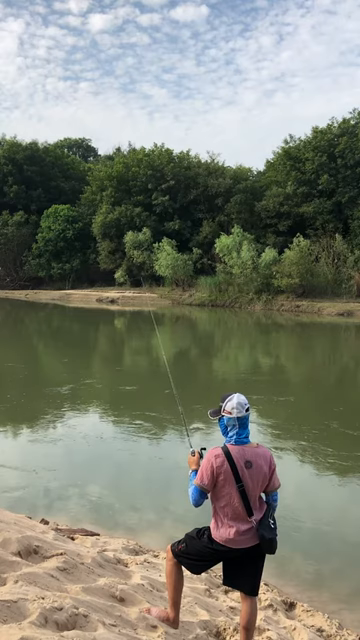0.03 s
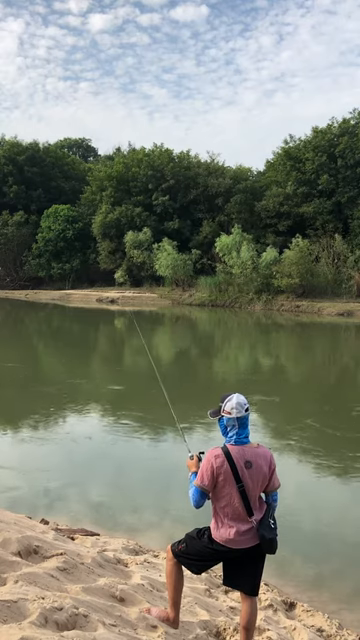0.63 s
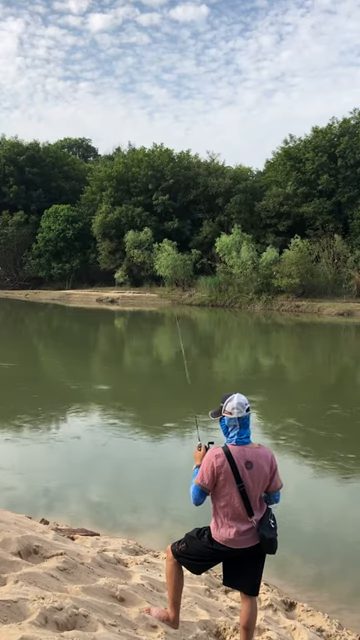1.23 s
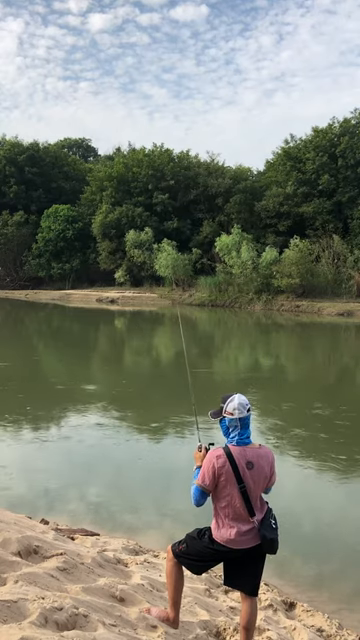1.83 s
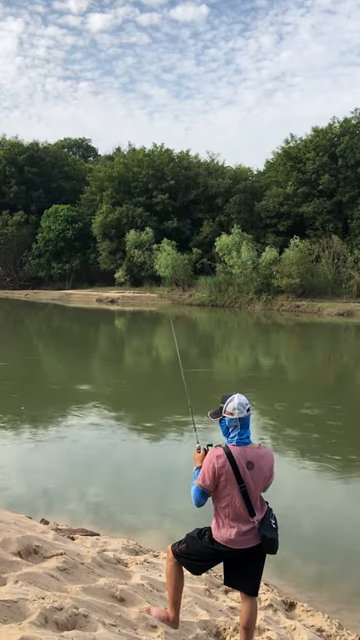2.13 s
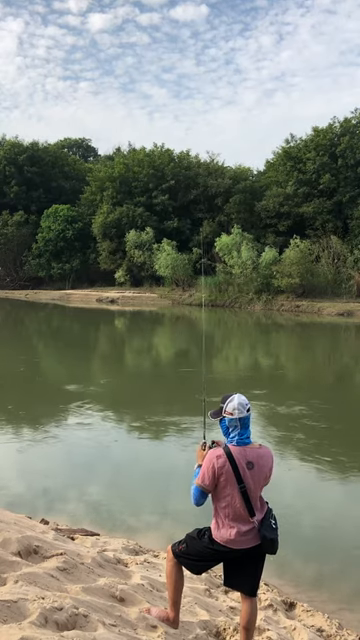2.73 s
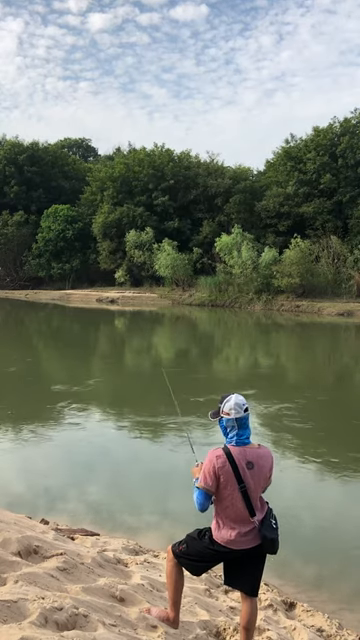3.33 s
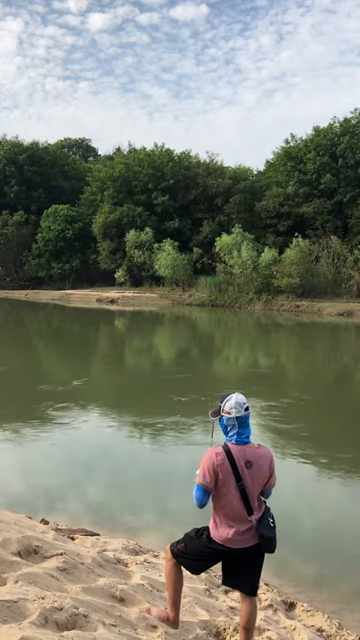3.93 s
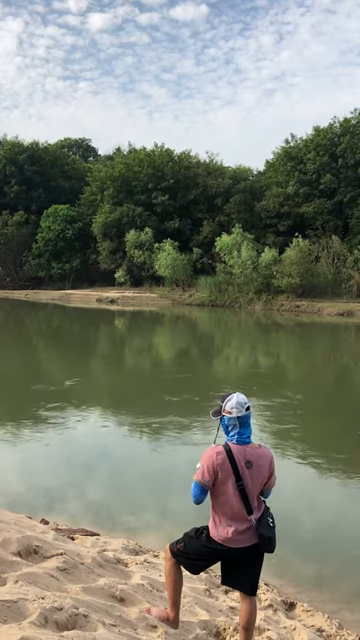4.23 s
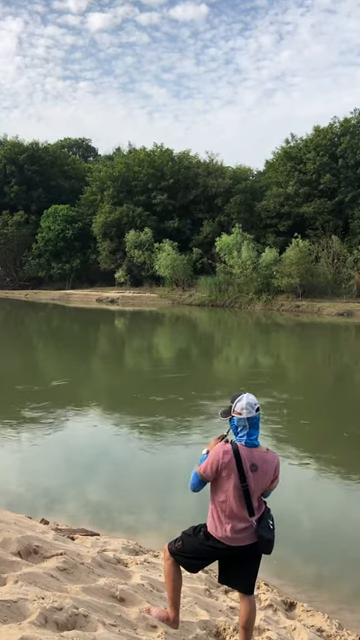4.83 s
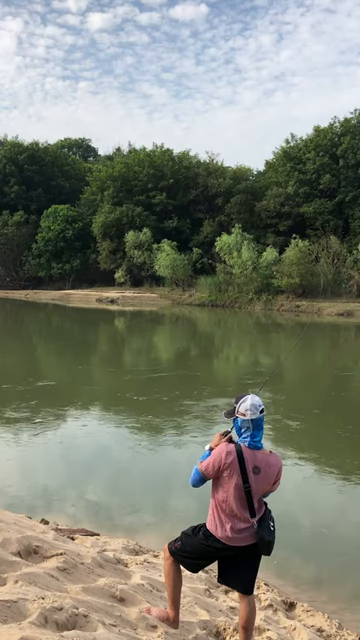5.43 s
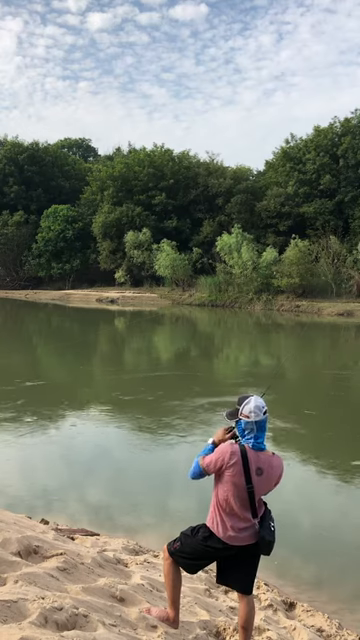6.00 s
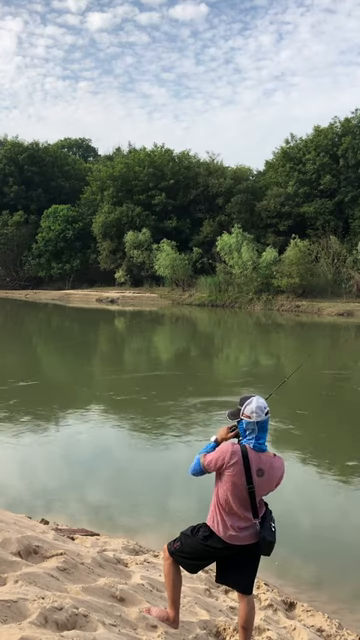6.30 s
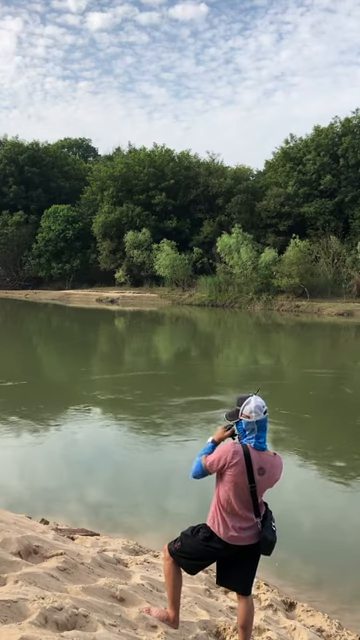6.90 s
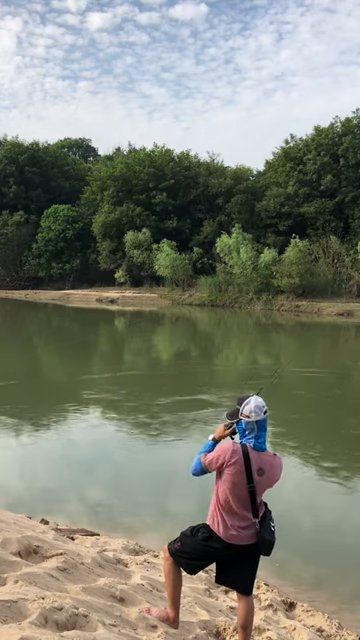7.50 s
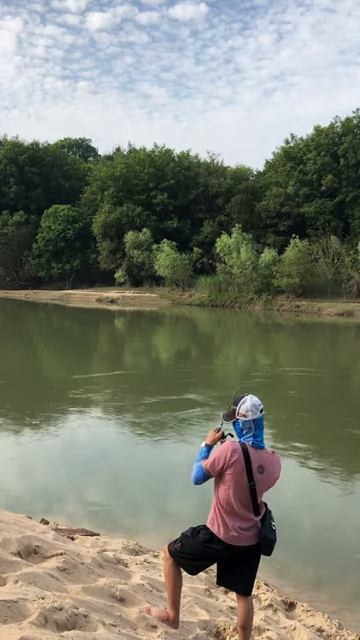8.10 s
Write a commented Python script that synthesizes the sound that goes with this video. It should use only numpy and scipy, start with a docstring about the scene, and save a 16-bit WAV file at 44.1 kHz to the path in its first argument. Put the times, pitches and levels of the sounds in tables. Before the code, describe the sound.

Cicadas buzz with a high, throbbing hiss throughout, outdoors on a riverbank, over the steady low rumble and roar of distant traffic and a droning diesel engine. Songbirds whistle short sliding notes from about 0.3 to 2 seconds, echoing softly in the trees. A hand knocks the microphone with a cluster of low thuds around 0.8 seconds, one more at 2 seconds, and the strongest near 4.4 seconds, followed by a brief dull scuff. The birds return at about 4.6 seconds and chirp often from 5 seconds to the end, mixed with fainter, farther calls. Faint rustles of an angler's clothing and line come near 1.4 and 3 seconds, then around 4.3, 5.6, 6.7 and 7.8 seconds. The far engine speeds up slightly at about 5.5 seconds and swells near 6 and 8 seconds.

```python
"""A sandy riverbank in summer. A chorus of cicadas buzzes in the trees, each insect clicking its
tymbals (small drum skins on its body), over the roar of distant traffic and a droning diesel engine.
Songbirds whistle sliding notes across the water, and the trees echo them. An angler's clothes and
line rustle faintly, and the hand that holds the microphone bumps it a few times."""
import sys
import numpy as np
from scipy import signal
from scipy.fft import rfft, irfft, next_fast_len
from scipy.io import wavfile
from scipy.ndimage import uniform_filter1d, map_coordinates

SR = 44100
rng = np.random.default_rng(int(sys.argv[2]) if len(sys.argv) > 2 else 0)


def int16_out(signal):
    """Quantize to a 16-bit WAV file."""
    q = np.round(np.clip(np.atleast_2d(signal).T, -1, 1) * 32767)
    wavfile.write(sys.argv[1], SR, q.astype(np.int16))


N = 359415

# How loud the traffic is. Each row: time in seconds, then rumble, roar and tyre hiss in dB.
TRAFFIC_LEVELS = [(0, -29, -25.5, -36.0), (1.0, -30.5, -27.5, -37.5), (1.6, -28.0, -26.0, -38.5),
                  (2.2, -29, -26.5, -38.0), (3.2, -30, -26.0, -40), (3.8, -31.5, -27.5, -40),
                  (4.7, -31.0, -29, -39.5), (5.4, -31.5, -28, -39.5), (6.2, -28.0, -27.0, -40),
                  (7.2, -27.5, -27, -38.0), (8.15, -31.5, -28.5, -39.5)]
# The tone of each steady noise. Each row: frequency in Hz, relative level in dB.
AIR_SPECTRUM = [(1500, -20), (2800, 5.5), (3700, 13.5), (4800, 10), (5600, 8.5), (7900, -26), (8900, 4.5),
                (9700, -2), (10400, -10), (11000, -3.5), (13700, 0), (14700, -7), (15100, -15)]
RUMBLE_SPECTRUM = [(20, -46), (28, -20), (41, -8), (58, -1), (80, 2.5), (110, 0.5), (145, -4), (204, -8),
                   (330, -15.5), (500, -55.5)]
ROAR_SPECTRUM = [(120, -34), (230, -7), (320, -2.5), (520, -2), (750, -1), (1050, -2), (1400, -10),
                 (1800, -20), (2600, -33.5), (5000, -68)]
TYRE_SPECTRUM = [(700, -27), (1400, 5), (1750, -1), (2100, -1.5), (2700, -10), (3300, -14), (5000, -27.5),
                 (8000, -60)]
# The roar also arrives by a longer path, which boosts evenly spaced frequencies.
# Each row: time in seconds, that spacing in Hz, strength of the late copy (1 is as loud as the first).
ROAR_ECHO = [(0, 920, .15), (1.6, 1040, 0.1), (2.2, 604, 0.059), (3.1, 540, 0.26), (4.7, 533, 0.012),
             (6.2, 736, .17), (8.15, 546, 0.27)]
# The exhaust's higher tones. Each row: multiple of the firing rate, relative level in dB.
ENGINE_OVERTONES = [(2, 0.5), (3, -9), (4, -16)]
# Swells as the engine pulls. Each row: middle in seconds, half length in seconds, level in dB.
ENGINE_PULLS = [(2.25, .15, -38), (3.9, .3, -44), (6.15, .5, -33.5), (8.1, 0.38, -27.5)]
# How long the trees echo. Each row: frequency in Hz, seconds to fade by 60 dB.
ECHO_TIMES = [(200, .6), (3000, .55), (10000, 0.25)]
# Calls from deep in the trees. Each row: middle and length in seconds, pitch and its spread in Hz,
# level in dB.
FAR_BIRD_CALLS = [(5.162, .085, 3250, 170, -45), (5.245, .26, 2073, 70, -43.5),
                  (5.47, 0.43, 4280, 400, -49), (6.12, .17, 2000, 44.7, -43), (7.767, .18, 4920, 400, -47),
                  (7.88, 0.08, 4120, 169.3, -42.5), (7.93, .14, 1994, 22.1, -37.5)]
# Rustles. Each row: loudest moment and fade time in seconds, centre in Hz, width in octaves, level in dB.
RUSTLE_STROKES = [(1.42, .1, 5000, .62, -55), (3.0, .11, 8600, .14, -55.5), (4.3, .1, 5100, .15, -51),
                  (4.52, 0.09, 438, 0.5, -24), (5.572, .1, 9100, .27, -51), (5.645, 0.12, 6800, .3, -49),
                  (6.58, 0.17, 8600, 0.2, -53.5), (6.76, .17, 5500, 0.39, -45), (7.67, .2, 8100, 0.24, -53),
                  (7.82, .2, 6000, .36, -49)]
# Bumps. Each row: middle in seconds, peak level in dB, middle pitch in Hz, half length in seconds.
HAND_BUMPS = [(0.778, -14.5, 90, 0.016), (0.804, -13.5, 101.6, .01), (0.843, -10.5, 99.8, .008),
              (0.873, -12.5, 135, 0.0062), (0.889, -12.5, 88, .0073), (1.996, -8.5, 98.4, 0.0066),
              (4.212, -18.5, 68, .018), (4.341, -14, 169.4, .0035), (4.358, -3, 126, 0.0066)]
# Whistled notes. Each row: start and length in seconds; first, turning and last pitch in Hz;
# where the note turns and where it is loudest (0 is its start, 1 its end); level in dB.
SONG_NOTES = [ (.29, .07, 2720, 2600, 2740, .55, .55, -45),
              (0.823, .085, 2250, 3110, 3100, 0.67, .65, -44.5),
              (1.008, .195, 3320, 4070, 4190, .7, 0.66, -39), (1.34, 0.15, 3150, 3600, 2300, .42, 0.8, -48),
              (1.485, .24, 2370, 2320, 2200, 0.3, .35, -47), (1.878, 0.036, 3290, 3520, 3980, .5, .45, -45),
              (4.598, .068, 4300, 2410, 3000, .52, .65, -45.5),
              (5.501, 0.26, 4780, 4280, 3900, 0.8, .8, -49),
              (5.747, 0.092, 3720, 3630, 2040, .54, .15, -37.5),
              (6.369, 0.048, 3270, 3450, 4080, .38, .6, -41),
              (6.565, .215, 4520, 4180, 3230, .35, .5, -40.5),
              (6.775, .062, 3080, 2630, 2520, .5, .55, -46),
              (7.125, 0.087, 2800, 3080, 3070, 0.5, 0.7, -43),
              (7.338, .27, 2460, 3166, 3220, .22, 0.6, -45), ]
# How a cicada's body rings. Each row: frequency in Hz, relative level in dB.
CICADA_SPECTRUM = [(4800, -65), (5650, -25), (5950, -10), (6150, -3.5), (6400, -1), (6520, 0.5),
                   (6670, -0.5), (6780, -3), (6920, -5.5), (7030, -5), (7150, -17), (7350, -24.5),
                   (7550, -25), (7900, -78)]
# The nearest cicadas. Each row: throbs a second, clicks a second, relative level in dB.
NEAR_CICADAS = [(28.8, 190, -7.5), (40.1, 251, -17)]


def amp(db):
    """Turn decibels into a gain to multiply by."""
    return 10 ** (np.asarray(db) / 20)


def unit(x):
    """Scale a signal to an average (rms) level of 1."""
    return x / np.sqrt(np.mean(x ** 2) + 1e-20)


def clock():
    """The time of every sample, in seconds."""
    return np.arange(N) / SR


def along(points, hz):
    """Read between (Hz, value) points on a logarithmic frequency scale."""
    freqs, values = np.transpose(points)
    return np.interp(np.log(hz + 1), np.log(freqs + 1), values)


def curves(rows):
    """Turn each column after the time into one value per sample."""
    times, *columns = np.transpose(rows)
    return [np.interp(clock(), times, column) for column in columns]


def wobble(rate):
    """A smooth curve through `rate` random values a second."""
    return map_coordinates(rng.standard_normal(int(N * rate / SR) + 4), [clock() * rate])


def phase(hz):
    """The running angle of a wave whose pitch changes, from a random start."""
    return 2 * np.pi * (np.cumsum(hz) / SR + rng.random())


def filtered(x, response):
    """Scale each frequency in x by response(hz)."""
    size = next_fast_len(N + SR // 2)
    return irfft(rfft(x, size) * response(np.fft.rfftfreq(size, 1 / SR)), size)[:N]


def coloured(x, spectrum):
    """Shape x with a spectrum table and bring it to level 1."""
    return unit(filtered(x, lambda hz: amp(along(spectrum, hz))))


def rush(spectrum, patchy_db):
    """Shaped noise with drifting louder and softer patches."""
    bands = signal.stft(rng.standard_normal(N), nperseg=1024)[2]
    patches = uniform_filter1d(rng.standard_normal(bands.shape), size=5, axis=0)  # smooth in frequency
    patches = uniform_filter1d(patches, size=20, axis=1)  # and in time
    noise = signal.istft(bands * amp(patchy_db * unit(patches)), nperseg=1024)[1][:N]
    return coloured(noise, spectrum)


def air(level_db=-52.0):
    """A faint, even hiss of air."""
    return amp(level_db) * coloured(rng.standard_normal(N), AIR_SPECTRUM)


def traffic(sway_db=0.45):
    """Far traffic: a low rumble, tyre hiss, and a roar that mixes with a late copy of itself."""
    rumble_db, roar_db, tyres_db = curves(TRAFFIC_LEVELS)
    spacing_hz, echo_gain = curves(ROAR_ECHO)
    direct = rush(ROAR_SPECTRUM, patchy_db=0.32)
    late = np.interp(clock() - 1 / spacing_hz, clock(), direct)
    roar = amp(roar_db) * unit(direct + echo_gain * late)
    rumble = amp(rumble_db + sway_db * wobble(5)) * rush(RUMBLE_SPECTRUM, patchy_db=0.2)
    tyres = amp(tyres_db) * rush(TYRE_SPECTRUM, patchy_db=1.5)
    return rumble + roar + tyres


def engine(idle_hz=59.5, rev_hz=62.8, rev_at_s=5.55, rev_takes_s=0.303, sway_db=2):
    """A far diesel's exhaust drones at its firing rate and speeds up; each tone wavers on its way here."""
    rev = np.clip((clock() - rev_at_s) / rev_takes_s, 0, 1)
    firing_hz = idle_hz + rev * (rev_hz - idle_hz)
    angle = phase(firing_hz * (1 + 0.00467 * wobble(4)))
    pulls = sum(amp(db) * np.exp(-((clock() - middle) / half) ** 2) for middle, half, db in ENGINE_PULLS)
    overtones_db = -36 - 4 * rev  # softer once the engine speeds up
    tones = [(1, amp(-39.5) + pulls)]
    tones += [(multiple, amp(overtones_db + db)) for multiple, db in ENGINE_OVERTONES]
    drone = np.zeros(N)
    for multiple, gain in tones:
        drone += gain * amp(sway_db * wobble(5)) * np.sin(multiple * angle + 0.73 * wobble(7))
    return np.sqrt(2) * drone


def tree_echo(sound):
    """The trees scatter a sound into a soft echo whose treble dies first."""
    hz, t, bands = signal.stft(rng.standard_normal(SR), SR, nperseg=256)
    fade = amp(-60 * t / along(ECHO_TIMES, hz)[:, None])
    tail = signal.istft(bands * fade, SR, nperseg=256)[1]
    return signal.fftconvolve(sound, tail / np.linalg.norm(tail))[:N]


def far_birds():
    """Distant bird notes, their pitch blurred by the leaves."""
    calls = np.zeros(N)
    for middle, length, hz, spread_hz, db in FAR_BIRD_CALLS:
        swell = np.exp(-(2 * (clock() - middle) / length) ** 2)
        blurred_hz = hz + spread_hz * wobble(2 * spread_hz)
        calls += amp(db) * swell * np.sqrt(2) * np.sin(phase(blurred_hz))
    return calls


def rustles(grain_db=3.5, rise_share=0.3):
    """Cloth, fishing line and sand: short, grainy strokes of noise that rise quickly and fade."""
    strokes = np.zeros(N)
    grain = unit(amp(grain_db * wobble(400)))
    for loudest, fade, centre_hz, octaves, db in RUSTLE_STROKES:
        age = (clock() - loudest) / fade
        swell = np.exp(-(np.minimum(age, 0) / rise_share) ** 2 - 2 * np.maximum(age, 0))
        noise = rng.standard_normal(N)
        band = filtered(noise, lambda hz: np.exp(-0.5 * (np.log2((hz + 1) / centre_hz) / octaves) ** 2))
        strokes += amp(db) * swell * unit(band)
    return strokes * grain


def bumps():
    """A hand knocks the microphone: short, low thuds that sink further in pitch the harder the knock."""
    thuds = np.zeros(N)
    for middle, db, hz, half in HAND_BUMPS:
        bend_octaves = 2.1 * amp(db) ** 2  # starts this far above hz and ends this far below
        age = np.clip((clock() - middle) / half, -4, 4)
        swell = np.exp(-age ** 2 / 2) * (1 - (age / 4) ** 2) ** 2
        sinking_hz = hz * 2 ** (-bend_octaves * np.tanh(age))
        thuds += amp(db) * swell * np.sin(phase(sinking_hz))
    return thuds


def songbirds(warble_hz=24.1, flutter_db=1.4, slur_share=0.204, ends_db=-10, edge_s=0.005):
    """Birds whistle nearly pure notes; each slides to a turning pitch and onward, swelling once."""
    song = np.zeros(N)
    quaver = 0.0057 * wobble(110)
    warble = 0.012 * np.sin(phase(warble_hz * (1 + 0.151 * wobble(10))))
    flutter = amp(flutter_db * wobble(70))
    for start, length, first_hz, turn_hz, last_hz, turn_at, loudest_at, db in SONG_NOTES:
        progress = (clock() - start) / length
        slide = np.interp(progress, [0, turn_at, 1], [first_hz, turn_hz, last_hz])
        hz = uniform_filter1d(slide, size=round(slur_share * length * SR))  # rounds off the turn
        shake = (quaver + warble) * np.minimum(hz / 4000, 1) ** 5  # low notes are steadier
        angle = phase(hz * (1 + shake))
        whistle = np.sqrt(2) * (np.sin(angle) + amp(-32) * np.sin(3 * angle))
        swell_db = ends_db * np.interp(progress, [0, loudest_at, 1], [1, 0, 1]) ** 2
        on_off = np.clip(np.minimum(progress, 1 - progress) * length / edge_s + 1, 0, 1)
        song += on_off * amp(db + swell_db) * whistle
    return song * flutter


def cicadas(level_db=-35.5):
    """Fast tymbal clicks ring in the insects' bodies. Near ones throb; the crowd blurs into a hiss."""
    chorus = amp(-1) * rng.standard_normal(N)  # the crowd
    for throb_hz, click_hz, db in NEAR_CICADAS:
        throb = 1 + np.sin(phase(throb_hz * (1 + 0.015 * wobble(3.1))))
        clicks = np.exp(0.74 * np.cos(phase(click_hz * (1 + 0.012 * wobble(5.5)))))
        chorus += amp(db) * unit(throb * clicks * rng.standard_normal(N))
    return amp(level_db) * coloured(chorus, CICADA_SPECTRUM)


def scene(echo_db=-10.5):
    """Everything heard from the bank, in one channel. Only the birds echo in the trees."""
    birds = songbirds() + far_birds()
    steady = air() + traffic() + engine() + cicadas()
    return (steady + birds + amp(echo_db) * tree_echo(birds) + rustles() + bumps())[None]


def record(dry, top_hz=15100):
    """Cut away the very highest treble."""
    return filtered(dry[0], lambda hz: hz < top_hz)[None]


dry = scene()
out = record(dry)
int16_out(out)
```